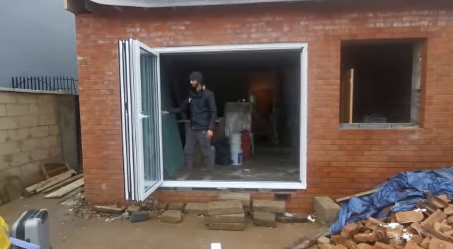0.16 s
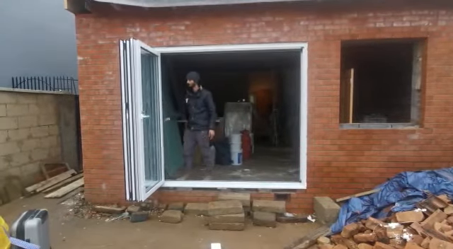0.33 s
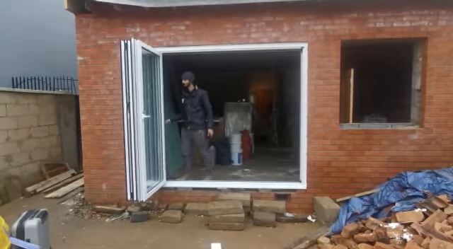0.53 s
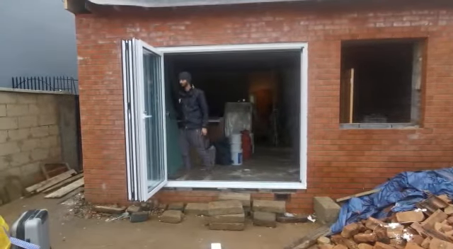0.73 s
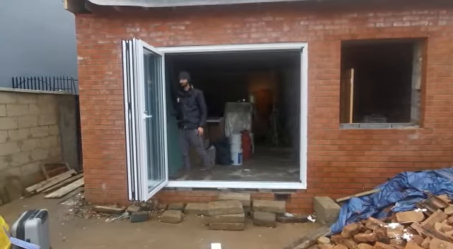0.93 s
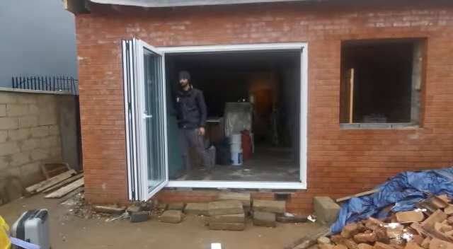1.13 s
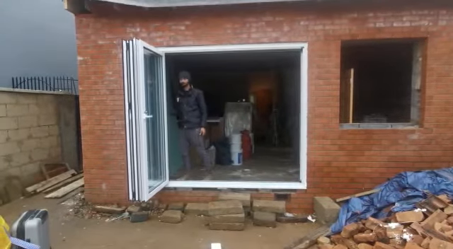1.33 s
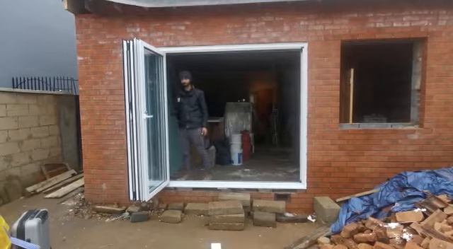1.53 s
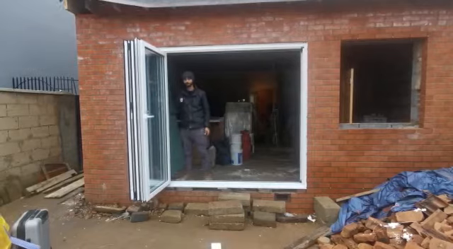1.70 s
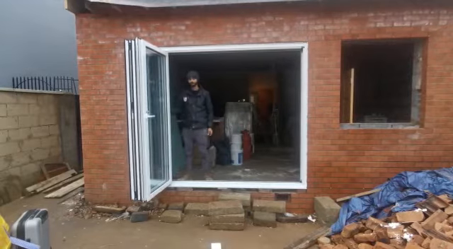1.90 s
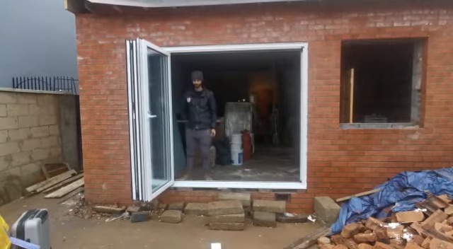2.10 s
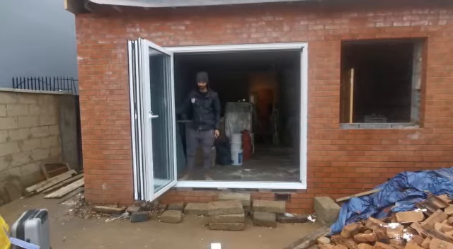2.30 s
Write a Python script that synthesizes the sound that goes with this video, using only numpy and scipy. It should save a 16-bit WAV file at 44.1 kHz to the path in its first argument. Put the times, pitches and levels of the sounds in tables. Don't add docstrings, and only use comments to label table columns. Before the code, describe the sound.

Wind rumble thumping on the microphone, with a short door clatter and gritty boot scuffs

```python
import sys
import numpy as np
from scipy import signal
from scipy.fft import rfft, irfft, next_fast_len
from scipy.io import wavfile
from scipy.ndimage import uniform_filter1d

SR = 44100
rng = np.random.default_rng(int(sys.argv[2]) if len(sys.argv) > 2 else 0)


def level_to_linear(level):
    exponent = np.asarray(level, float) / 20
    return 10 ** exponent


def generate_wav(signal):
    frames = np.transpose(np.atleast_2d(signal))
    scaled = np.clip(frames, -1, 1) * 32767
    pcm = np.round(scaled).astype(np.int16)
    wavfile.write(sys.argv[1], SR, pcm)


N = 103635

# (time [s], peak level [dB], swing [Hz], length [cycles])
LEFT_EDDIES = [(.2, -17.5, 42, 0.41), (.268, -13, 56, 0.23), (.296, -20, 55, 0.73), (.44, -26, 45, .8),
               (.5, -32, 45, 1.2), (.576, -23, 36.9, 4.9), (.716, -15, 63, 0.51), (.797, -24, 50.7, 0.91),
               (.847, -27, 47.7, 3.8), (1.029, -11, 137, 0.52), (1.057, -29, 60.4, 1.2),
               (1.113, -19.5, 73, 0.34), (1.147, -11.5, 57.7, 0.22), (1.3, -15.5, 111, 0.61),
               (1.372, -12.5, 69.4, 0.56), (1.397, -14.5, 90.3, 2.6), (1.410, -6, 161, 1.4),
               (1.424, -11, 108, 2.9), (1.446, -7.5, 87, 0.16), (1.475, -31, 60.5, 0.3),
               (1.503, -16, 56.6, 0.65), (1.554, -18, 81, 0.65), (1.603, -18, 46, 0.54),
               (1.628, -15, 74, 0.42), (1.74, -18.5, 65, 0.31), (1.775, -25.5, 60.4, 0.65),
               (1.805, -40, 50, 0.92), (1.85, -20, 53.4, 0.43), (1.899, -22, 54.6, 0.29),
               (1.931, -25.5, 48, 1.5), (2.22, -37, 45.5, 1.6)]
RIGHT_EDDIES = [(0.692, -35, 36, 3.7), (1.115, -43, 54.3, 0.88), (1.499, -24, 51, 2.1),
                (1.534, -27, 61.5, 0.92), (1.553, -27, 66.4, 0.3), (1.633, -22, 50, 1.8),
                (1.653, -21, 54.7, 0.4), (1.676, -26, 73, 1.3), (1.699, -26, 60, 0.56)]
# (time [s], left level [dB], right level [dB])
GUST = [(0, -50, -54), (.17, -42, -57), (.24, -26, -71), (.4, -41, -63), (.55, -38.5, -53),
        (.72, -37.5, -54), (.95, -35.5, -61), (1.1, -28.5, -53), (1.26, -39.5, -49), (1.4, -20, -76),
        (1.46, -19, -46), (1.517, -37, -22), (1.59, -30, -47), (1.67, -29, -26.5), (1.75, -44, -50),
        (1.9, -34.5, -64), (2.05, -45, -72), (2.25, -51.5, -68)]
# (frequency [Hz], level [dB])
GUST_SPECTRUM = [(15, -14), (40, -4.5), (80, -8), (150, -16.5), (250, -25.5), (500, -78)]

# (frequency [Hz], level [dB], t60 [s])
PANEL_MODES = [(372, -6, .2), (425, -9, .18), (648, -9, .25), (743, 1, .32), (918, -8, .3), (832, -10, .25),
               (991, 4, .24), (1104, 4, .26), (1165, -9, .3), (1416, -13, .3), (1522, -11, .4),
               (1588, -8, .4), (1739, -13, .3), (2113, -13, .35)]
# (time [s], blow level [dB], tick level [dB])
RATTLE = [(0.432, -46, -35.5), (0.4373, -34.5, -31.5), (0.4403, -36, -27.5), (.449, -61, -36),
          (0.457, -36, -29.5), (.469, -29.5, -35), (0.48, -34.5, -38.5), (0.485, -37, -37),
          (0.501, -33.5, -37), (0.533, -36.5, -49), (.545, -40, -45), (0.566, -40.5, -59)]
# (frequency [Hz], level [dB])
TICK_SPECTRUM = [(500, -13), (2500, 2.5), (4000, -2), (5700, -3.5), (7200, -9), (10000, -9), (15000, -33)]
# (time [s], below 0 sounds at 0, level [dB], frequency [Hz], t60 [s])
BUMPS = [(-0.5, -35, 860, 0.062), (0.2, -38, 770, .06), (1, -30, 960, .06), (0, -35.5, 1500, 0.056),
         (0.2, -37, 1900, .05), (1.5, -51, 420, 0.1), (2.2, -45, 514, .1), (2.215, -33, 517, 0.053),
         (-1, -48, 290, .1), (1.5, -40, 514, .16), (1.5, -41, 650, 0.16), (2, -44, 420, 0.13),
         (1.3, -44.5, 320, 0.33), (0.2, -41, 290, .12)]
# (frequency [Hz], gain [dB])
PANEL_SHADE = [(600, -0.5), (800, -3.5), (1130, -7), (1350, 0)]

# (start [s], attack [s], drag [s], level [dB], sole thud [dB], easing [dB/s])
SCUFFS = [
    (-.05, 0.0089, 0.031, -37.5, -4, -78),
    (0.954, 0.014, 0.092, -32.5, -7.5, -81),
    (1.639, 0.039, 0.092, -31.5, -7.5, -62),
]
# (frequency [Hz], level [dB])
GRIT_SPECTRUM = [(300, -20.5), (1200, -10), (1600, -4), (3000, -3), (4700, -2), (7300, -11.5),
                 (8500, -14.5), (15000, -35)]
# (frequency [Hz], width [Hz], far spot level [dB], near spot level [dB])
SLAB_RINGS = [(1660, 250, -4, 2), (2076, 210, -10.5, -7), (2304, 33, -9.5, -15), (2097, 110, -11, -9.5),
              (2590, 510, -11, -3.5), (3110, 240, -43, -6), (3353, 220, -6, -14), (4100, 1400, -34, -24)]
# (frequency [Hz], width [Hz], level [dB])
TIP_RINGS = [(2090, 230, -4.5), (4010, 310, -2.5), (4650, 640, -1), (5500, 320, -3.5)]
# (frequency [Hz], width [Hz], level [dB])
SOLE_RINGS = [(318, 20, -4), (515, 45, 0), (588, 30, -2)]

# (frequency [Hz], t60 [s])
ROOM_T60 = [(250, 0.75), (1000, 0.76), (3000, 0.77), (8000, 0.81), (15000, 0.1)]
# (frequency [Hz], gain [dB])
LEFT_PORT = [(850, -0.5), (1150, -0.5), (1750, -5), (2500, -1), (3000, 2), (5000, 1.5), (7300, 3.5),
             (8800, -11)]
RIGHT_PORT = [(1400, 0.5), (2300, 6), (2600, -21.5), (3050, 6), (3700, -16.5), (4400, 5.5), (8500, -7),
              (10200, -3)]
# (frequency [Hz], correlation [0..1])
PORT_LIKENESS = [(100, 1), (600, 0.13), (1200, 0.88), (1700, 1), (2100, 0.16), (3000, 0.35), (3800, 0.48),
                 (6000, 0.06)]
# (frequency [Hz], level [dB])
HUM_SPECTRUM = [(30, -8), (150, 7.5), (400, 3), (1100, 2.5), (2200, -3.5), (5000, -13), (7400, -17.5),
                (15000, -29)]
# (frequency [Hz], gain [dB])
CAPSULE = [(9400, -1), (10500, 1), (12000, -5), (13000, 3), (14000, -4), (14600, 3), (15100, 0),
           (15500, -8)]


def evened(x):
    return x / np.sqrt(np.mean(x ** 2) + 1e-20)


def read(points, hz):
    f, value = np.transpose(points)
    return np.interp(np.log(hz + 1), np.log(f + 1), value)


def colour(x, gain):
    n = next_fast_len(x.shape[-1] + 4096)
    spectrum = rfft(x, n) * gain(np.fft.rfftfreq(n, 1 / SR))
    return irfft(spectrum, n)[..., :x.shape[-1]]


def shaped(x, table):
    return colour(x, lambda hz: level_to_linear(read(table, hz)))


def resonate(x, hz, width_hz):
    r = np.exp(-np.pi * width_hz / SR)
    w = 2 * np.pi * hz / SR
    return signal.lfilter([(1 - r) * 2 * np.sin(w)], [1, -2 * r * np.cos(w), r * r], x)


def rung(x, rings):
    out = 0
    for hz, width_hz, db in rings:
        ring = resonate(resonate(x, hz, width_hz), hz, 3 * width_hz)
        out = out + level_to_linear(db) * evened(ring)
    return evened(out)


def drift(rate_hz, channels=1):
    return evened(colour(rng.standard_normal((channels, N)), lambda hz: np.exp(-(hz / rate_hz) ** 2)))


def wind():
    lump_db, lump_hz = 2.5, 12.3
    lean_rad = 0.48
    low_cut_hz, eddy_top_hz = 3.1, 227
    t = np.arange(N) / SR
    s, left_db, right_db = np.transpose(GUST)
    gust_db = np.array([np.interp(t, s, left_db), np.interp(t, s, right_db)])
    level_db = gust_db + lump_db * drift(lump_hz, channels=2)
    out = level_to_linear(level_db) * evened(shaped(rng.standard_normal((2, N)), GUST_SPECTRUM))
    for port, eddies in enumerate((LEFT_EDDIES, RIGHT_EDDIES)):
        for at_s, db, hz, cycles in eddies:
            turns = (t - at_s) * hz
            envelope = 1 / (1 + (2.03 * turns / cycles) ** 2) ** 2
            out[port] += level_to_linear(db) * np.cos(2 * np.pi * turns + lean_rad) * envelope
    return colour(out, lambda hz: hz ** 2 / (hz ** 2 + low_cut_hz ** 2) / (1 + (hz / eddy_top_hz) ** 4))


def panel():
    tick_s, clack_s, bump_rise_s = 0.0088, 0.0022, 0.0011
    ring_db = 6.5
    held_s, held_db_per_s = 0.505, -350
    out, ticks, t = np.zeros(N), np.zeros(N), np.arange(12000) / SR
    modes = np.array([level_to_linear(db - 60 * t / t60) * np.sin(2 * np.pi * hz * t) for hz, db, t60 in PANEL_MODES])
    for blow, (s, blow_db, tick_db) in enumerate(RATTLE):
        at = round(s * SR)
        mix = 1 + 0.057 * np.tanh(rng.standard_normal(len(PANEL_MODES)))
        if blow == 1:
            held_db = held_db_per_s * np.maximum(s + t - held_s, 0)
            envelope = level_to_linear(ring_db + held_db) * np.minimum(t / clack_s, 1)
        else:
            envelope = np.exp(-t / clack_s)
        out[at:at + len(t)] += level_to_linear(blow_db) * (mix @ modes) * envelope
        ticks[at:at + len(t)] += level_to_linear(tick_db) * rng.standard_normal(len(t)) * np.exp(-t / tick_s)
    for s, db, hz, t60 in BUMPS:
        bump = level_to_linear(db - 60 * t / t60) * np.sin(2 * np.pi * hz * t) * np.minimum(t / bump_rise_s, 1)
        part = out[round(max(s, 0) * SR):][:len(t)]
        part += bump[:len(part)]
    return out + shaped(ticks, TICK_SPECTRUM)


def crushed_grit():
    grit_per_s, spread_db = 3000, -3.5
    sizes = level_to_linear(spread_db * np.minimum(rng.exponential(1, N), 4))
    clicks = sizes * (rng.random(N) < grit_per_s / SR)
    return evened(clicks * rng.choice([-1., 1.], N))


def on_slab(clicks, grit, level_column):
    rings = sum(level_to_linear(row[level_column]) * evened(resonate(clicks, *row[:2])) for row in SLAB_RINGS)
    return evened(grit + rings)


def boot():
    lift_db_per_s, thud_rise_s = -120, 0.047
    strike_db, strike_s = -32, 0.013
    t = np.arange(N) / SR
    clicks = crushed_grit()
    grit = evened(shaped(clicks, GRIT_SPECTRUM))
    far, near = on_slab(clicks, grit, 2), on_slab(clicks, grit, 3)
    sole = rung(clicks, SOLE_RINGS)
    out, uneven = np.zeros(N), level_to_linear(0.13 * drift(30)[0])
    for (s, attack_s, drag_s, db, thud_db, ease_db_per_s), scrape in zip(SCUFFS, (far, near, far)):
        u = t - s
        ease_db = ease_db_per_s * np.clip(u, 0, drag_s)
        lift_db = lift_db_per_s * np.maximum(u - drag_s, 0)
        onset = np.sqrt(np.clip(u / attack_s, 0, 1))
        thud = level_to_linear(thud_db) * np.clip(u / thud_rise_s, 0, 1) * sole
        out += level_to_linear(db + ease_db + lift_db) * (onset * scrape + thud)
    u = t - SCUFFS[1][0]
    strike = level_to_linear(strike_db) * (u > 0) * np.exp(-abs(u) / strike_s) * rung(clicks, TIP_RINGS)
    return out * uneven + strike


def room(x, wet_db, damp):
    taps = np.zeros((2, SR))
    at = np.arange(200, SR - 20, 20) + rng.integers(0, 20, (2, (SR - 201) // 20))
    np.put_along_axis(taps, at, rng.choice([-1., 1.], at.shape), 1)
    hz, t, z = signal.stft(taps, SR, nperseg=256)
    decay = level_to_linear(-60 * damp * t / read(ROOM_T60, hz)[:, None])
    tail = signal.istft(z * decay, SR, nperseg=256)[1]
    tail = tail / np.linalg.norm(tail[0])
    wet = signal.fftconvolve(x[None], tail, axes=1)[:, :N] * level_to_linear(wet_db)
    quarter_turn = colour(x, lambda hz: 1j)
    return wet + np.array([x, 0.8 * quarter_turn])


def thin(x):
    low_cut_hz = 258
    return colour(x, lambda hz: 1 / (1 + (low_cut_hz / (hz + 1)) ** 6))


def ports(first, second):
    lag_samples = 22

    def same(hz):
        return np.clip(read(PORT_LIKENESS, hz), 0, 1)

    right = colour(first, same) + colour(second, lambda hz: np.sqrt(1 - same(hz) ** 2))
    return np.array([shaped(first, LEFT_PORT), shaped(np.roll(right, lag_samples), RIGHT_PORT)])


def whine():
    centre_hz, width_hz = 3327, 206
    level_db, flicker_db, right_db = -56.5, -2.5, -5
    band = resonate(rng.standard_normal((2, N)), centre_hz, width_hz)
    band = resonate(band, centre_hz, 2 * width_hz)
    return level_to_linear(level_db + flicker_db * drift(35) + [[0], [right_db]]) * evened(band)


def hum():
    level_db, patch_db, swell_db = -45, 0.5, 0.3
    frames, hz = N // 256 + 5, np.fft.rfftfreq(1024, 1 / SR)
    a, b, c, d, patches = rng.standard_normal((frames, 513, 5)).T
    patches = uniform_filter1d(patches, 10, 0)
    patches = evened(uniform_filter1d(patches, 12, 1))
    z = np.array([a + 1j * b, c + 1j * d])
    z = z * level_to_linear(read(HUM_SPECTRUM, hz)[:, None] + patch_db * patches)
    noise = signal.istft(z, nperseg=1024, noverlap=768)[1][:, :N]
    return level_to_linear(level_db + swell_db * drift(1.0)) * evened(noise)


def scene():
    left, right = ports(*thin(room(panel(), wet_db=-11, damp=2.2)))
    door = np.array([shaped(left, PANEL_SHADE), right])
    steps = thin(room(boot(), wet_db=-3.5, damp=1))
    return wind() + door + ports(*(steps + hum())) + whine()


def roll_off(x):
    return signal.sosfilt(signal.butter(12, 15610, fs=SR, output="sos"), x)


def record(dry):
    edge_hz = 15720
    mix = colour(shaped(dry, CAPSULE), lambda hz: hz < edge_hz)
    return roll_off(mix)


dry = scene()
out = record(dry)
generate_wav(out)
```